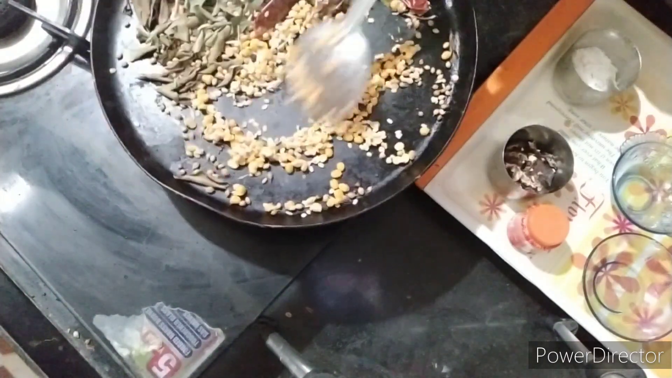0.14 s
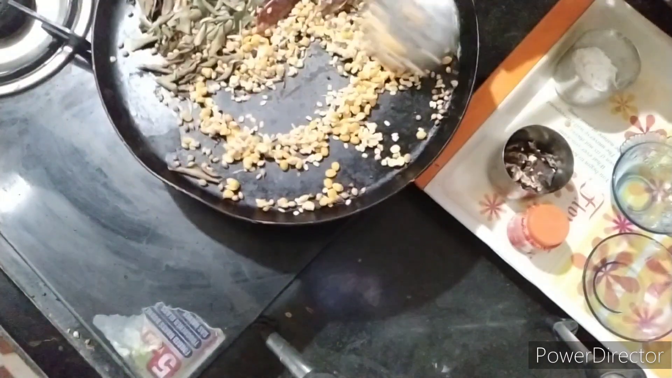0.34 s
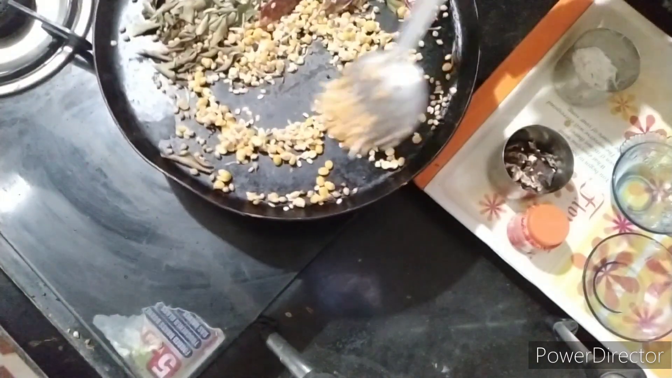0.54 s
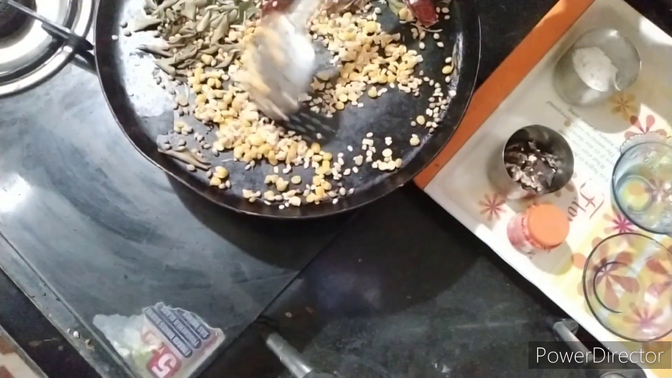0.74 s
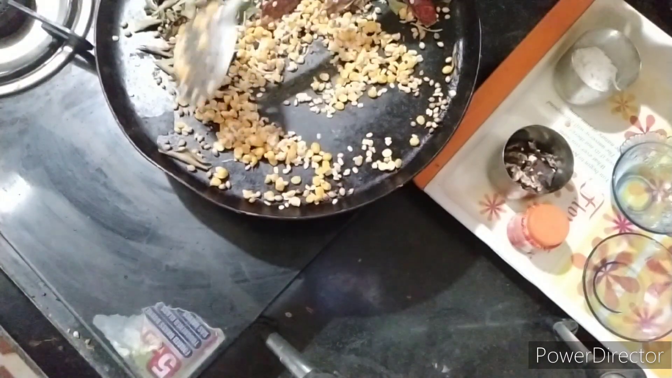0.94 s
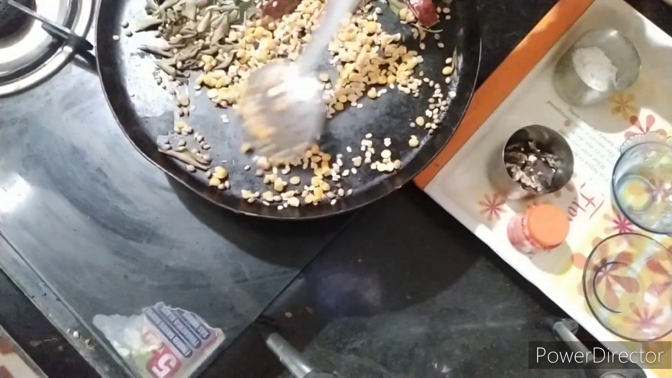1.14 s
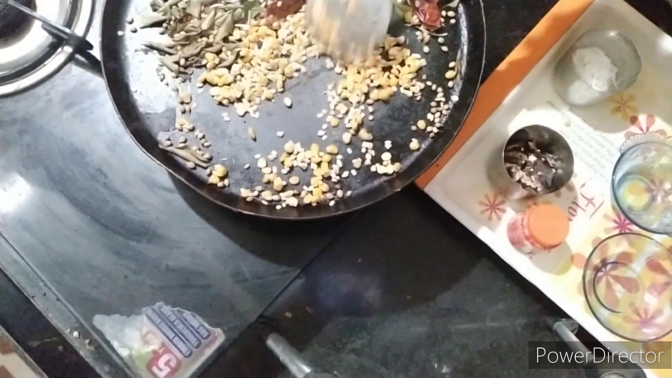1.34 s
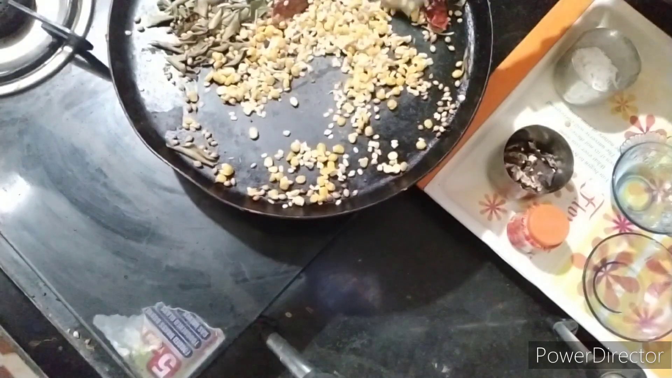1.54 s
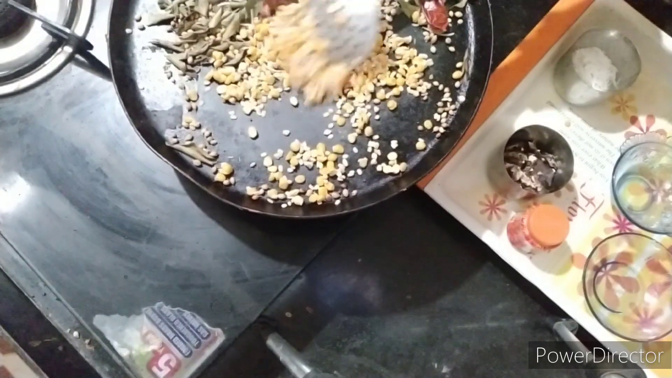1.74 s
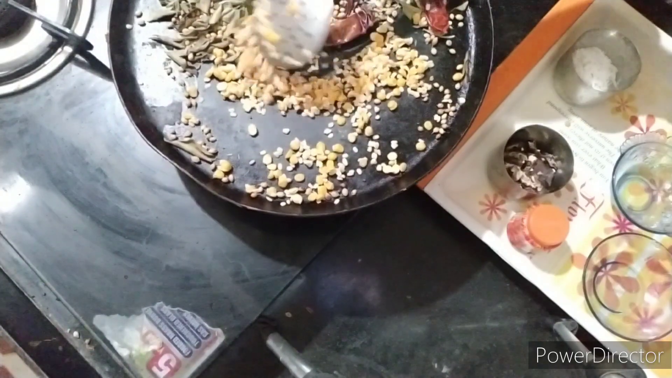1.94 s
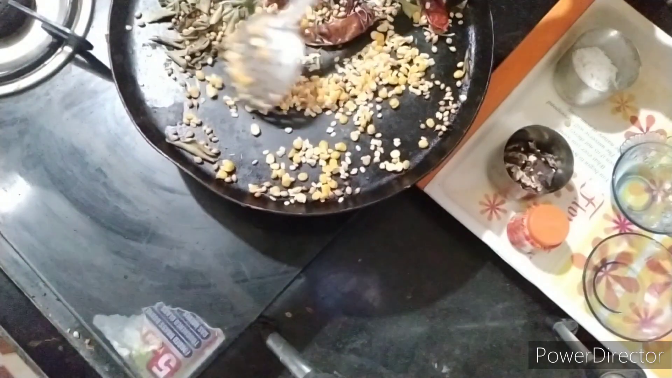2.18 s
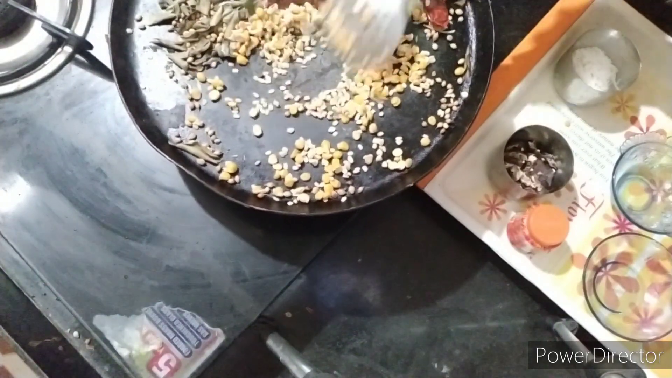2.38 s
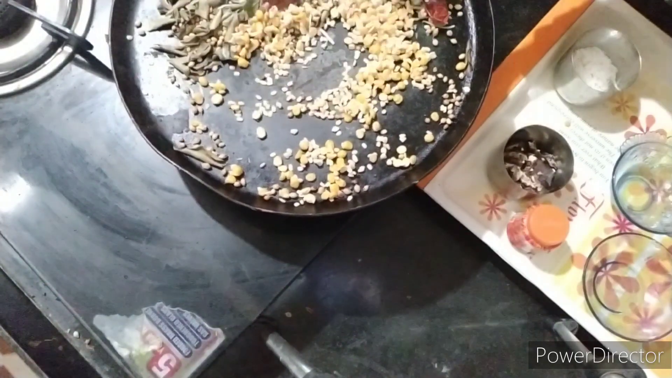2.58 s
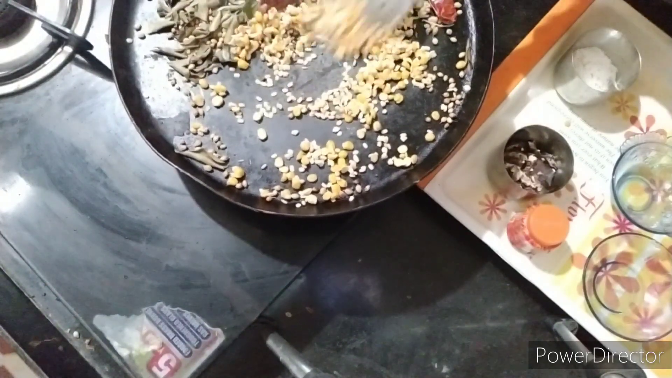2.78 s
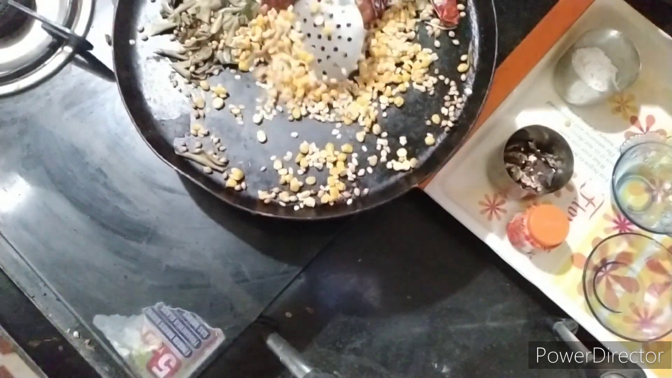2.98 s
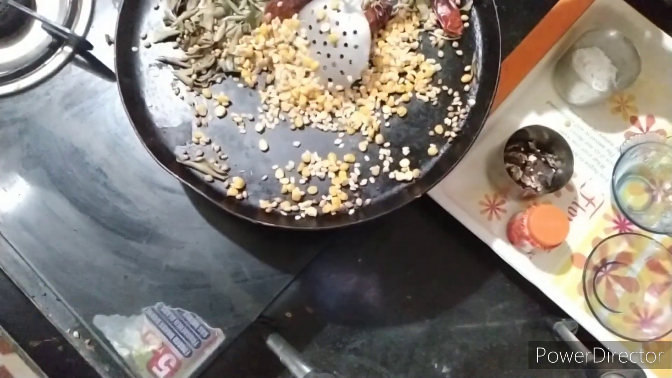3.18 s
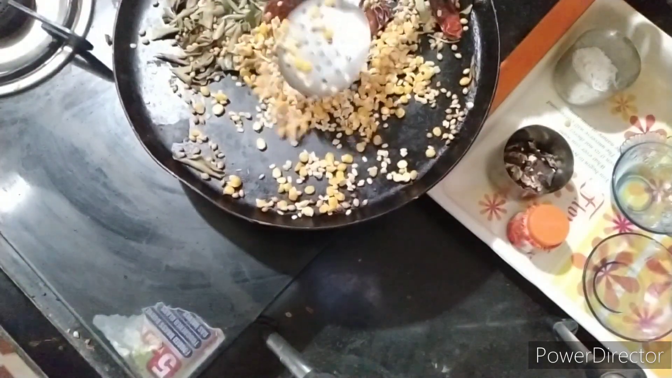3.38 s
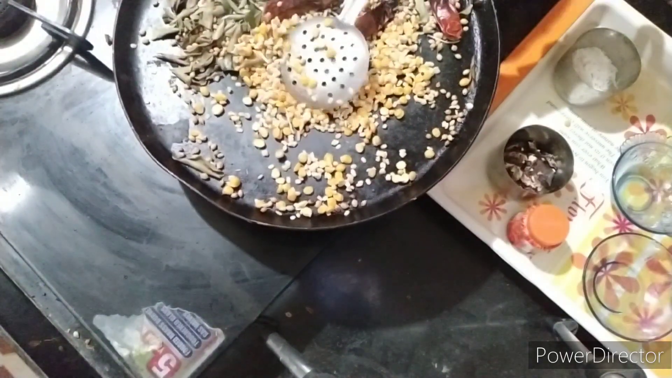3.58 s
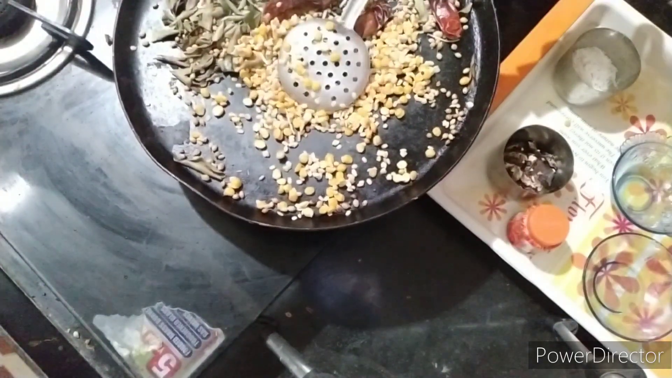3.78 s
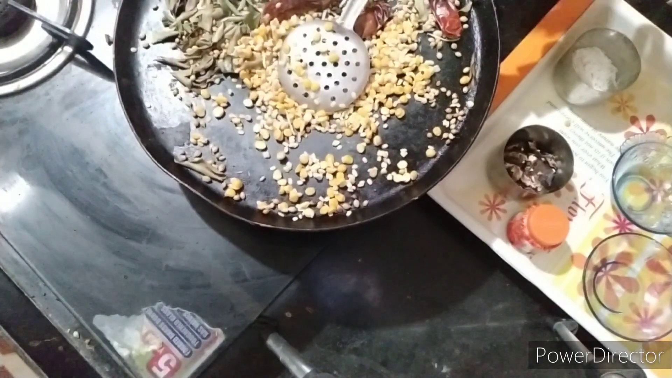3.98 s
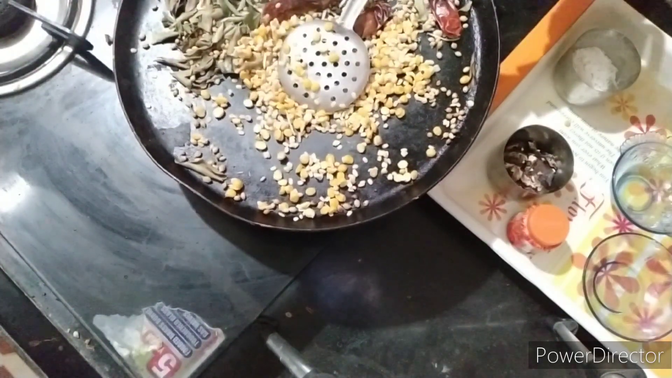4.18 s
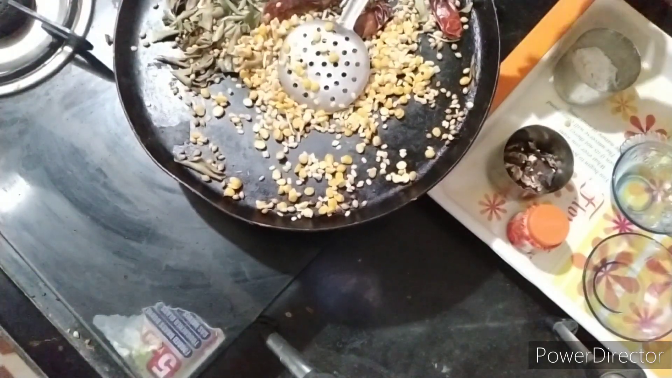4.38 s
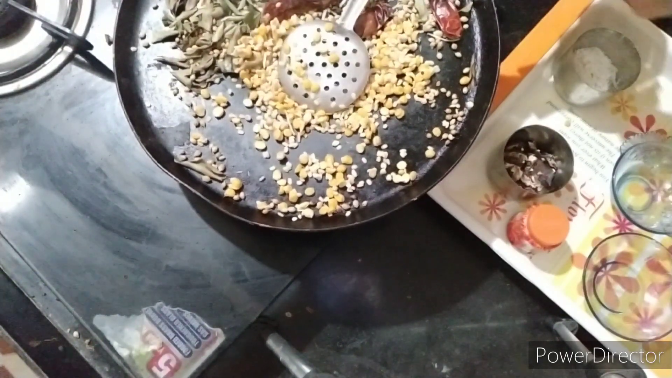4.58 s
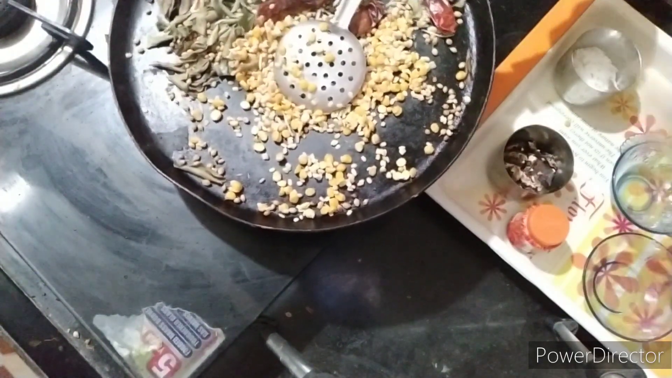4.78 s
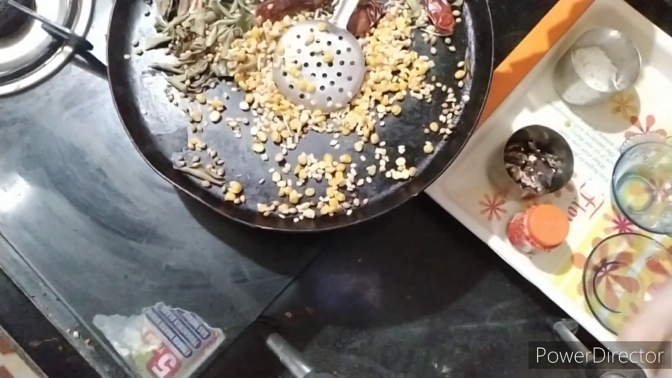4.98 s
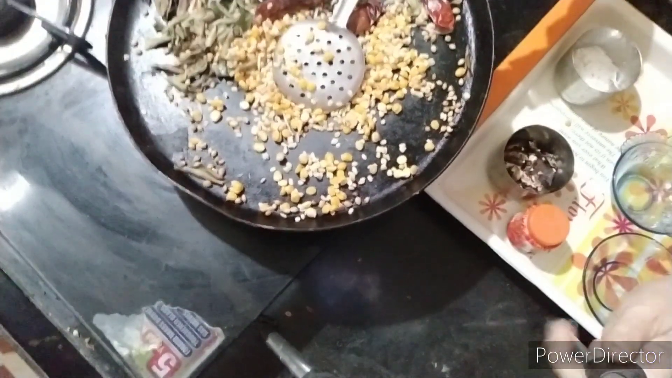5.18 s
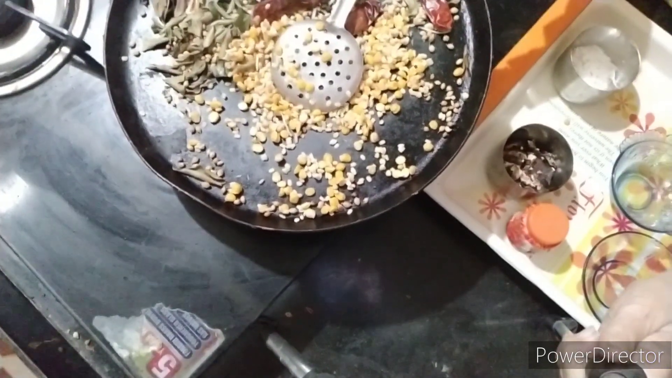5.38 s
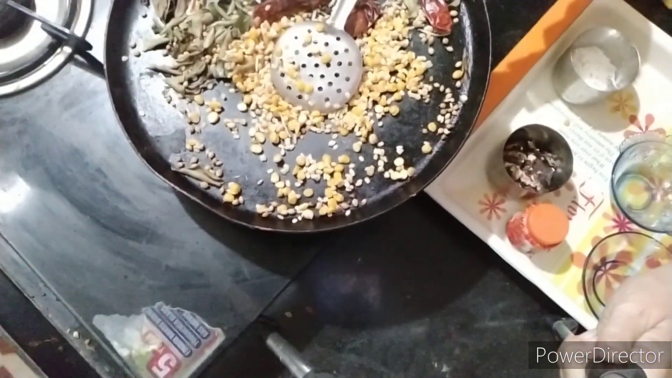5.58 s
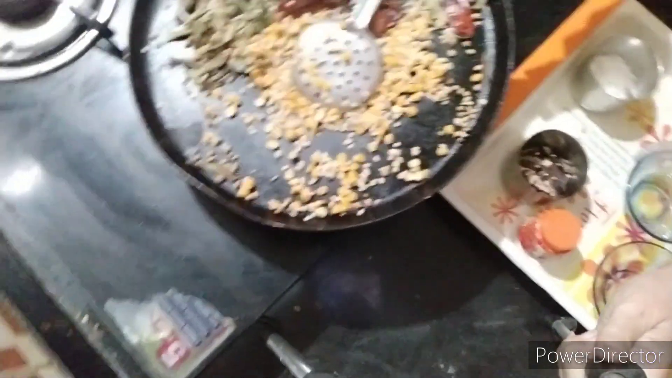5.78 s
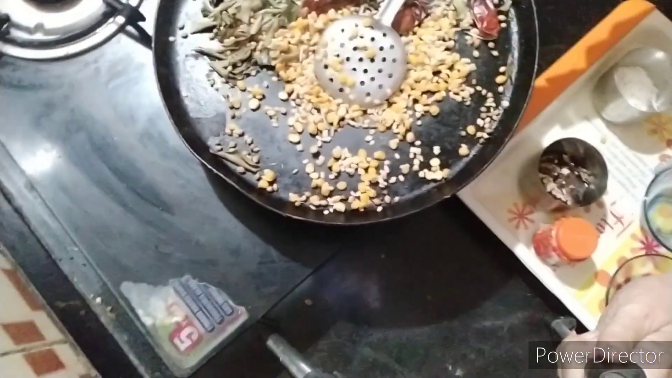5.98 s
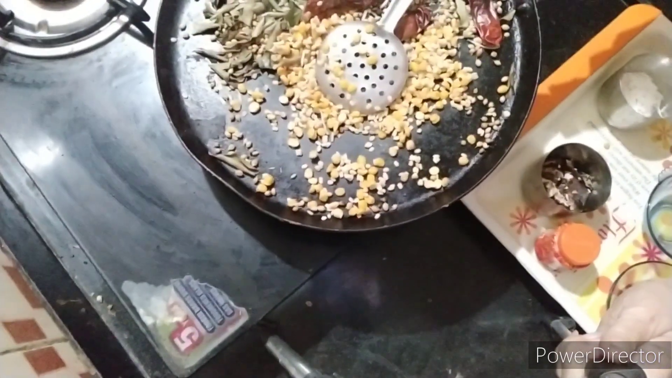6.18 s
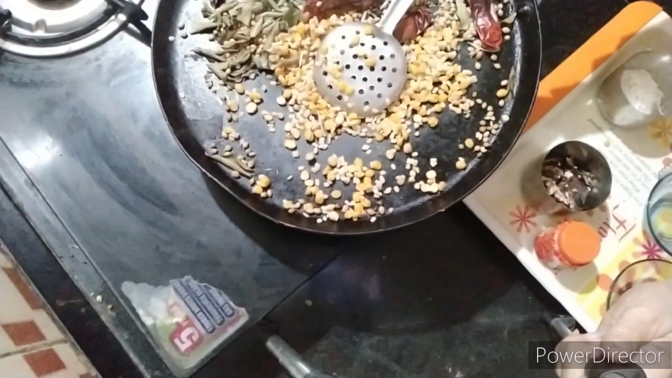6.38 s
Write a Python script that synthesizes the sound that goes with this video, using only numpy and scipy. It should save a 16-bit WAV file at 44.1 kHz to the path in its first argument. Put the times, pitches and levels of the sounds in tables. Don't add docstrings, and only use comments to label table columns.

```python
import sys
import numpy as np
from scipy import signal
from scipy.fft import rfft, irfft, next_fast_len
from scipy.io import wavfile
from scipy.ndimage import uniform_filter1d, map_coordinates

SR = 44100
rng = np.random.default_rng(int(sys.argv[2]) if len(sys.argv) > 2 else 0)


def boost(x):
    u = np.asarray(x, float) / 20
    return 10 ** u


def wrap_up_sound(samples):
    columns = np.atleast_2d(samples).T
    tamed = np.clip(columns, -1, 1)
    steps = np.round(tamed * 32767).astype(np.int16)
    wavfile.write(sys.argv[1], SR, steps)


N = 283550
LAID_DOWN = 4.4


def unit(x):
    return x / np.sqrt(np.mean(x ** 2) + 1e-20)


def along(points, hz):
    f, v = np.transpose(points)
    return np.interp(np.log(hz + 1), np.log(f + 1), v)


def filtered(x, response):
    m = next_fast_len(x.shape[-1] + 8192)
    return irfft(rfft(x, m) * response(np.fft.rfftfreq(m, 1 / SR)), m)[..., :x.shape[-1]]


def colour(points):
    hz = np.fft.rfftfreq(1024, 1 / SR)
    cepstrum = irfft(np.log(boost(np.maximum(along(points, hz), -60))))
    cepstrum[1:512] *= 2
    cepstrum[513:] = 0
    h = irfft(np.exp(rfft(cepstrum)))[:512]
    return h / np.linalg.norm(h)


def modes(table, widen):
    t = np.arange(SR // 4) / SR
    h = np.zeros(len(t))
    for k, (hz, width, db) in enumerate(table):
        fade = np.exp(-np.pi * width * widen * t)
        h += (-1) ** k * boost(db) * np.sqrt(width) * fade * np.sin(2 * np.pi * hz * t)
    return h / np.linalg.norm(h)


def ring(x, h):
    return signal.fftconvolve(x, h[None], axes=1)[:, :N]


def add_at(out, s, sound):
    out[:, round(s * SR):][:, :sound.shape[1]] += sound


def wobble(rate):
    return map_coordinates(rng.standard_normal(int(N * rate / SR) + 4), [np.arange(N) * rate / SR])


def swells(middle, length, level_db, rise=0.69):
    step = 64
    x = (np.arange(0, N + step, step) / SR - middle[:, None]) / length[:, None]
    x = np.where(x < 0, -x / rise, x)
    loss_db = 16 * x ** 1.18
    gain = np.sqrt(np.sum(boost(level_db[:, None] - loss_db) ** 2, 0))
    return np.interp(np.arange(N), np.arange(len(gain)) * step, gain)


def grains(per_s, spread_db, clump_db, bed, life, alike):
    struck = rng.random(N) < per_s / SR
    size = boost(spread_db * np.minimum(rng.exponential(size=N), 3))
    power = signal.lfilter([1], [1, -np.exp(-1 / (life * SR))], struck * size ** 2)
    bursts = np.sqrt(np.abs(power))
    common, apart = rng.standard_normal((2, N))
    turn = np.arccos(np.clip(alike, 0, 1)) / 2
    pair = np.cos(turn) * common + np.sin(turn) * apart * np.array([[1], [-1]])
    return unit(boost(clump_db * wobble(45)) * (unit(bursts) + bed) * pair)


# (frequency [Hz], level [dB])
KITCHEN_AIR = [(15, -14.5), (30, -5.5), (59, -9), (107, -18), (220, -12.5), (480, -17), (800, -23.5),
               (1500, -29.5), (3000, -34), (6000, -31), (8000, -35), (10000, -28), (12300, -33.5),
               (15800, -55)]
# (frequency [Hz], likeness [0 to 1])
AIR_LIKENESS = [(30, 0.29), (120, 0.27), (300, 0.25), (1000, 0.29), (4000, 0.17)]


def kitchen():
    def mid_and_side(hz):
        turn = np.arccos(np.clip(along(AIR_LIKENESS, hz), -1, 1)) / 2
        return boost(along(KITCHEN_AIR, hz)) * [np.cos(turn), np.sin(turn)]

    mid, side = filtered(rng.standard_normal((2, N)), mid_and_side)
    air = unit(np.array([mid + side, mid - side])) * boost(-59.5 + 0.45 * wobble(4.8))
    hum_hz = 160 + 3.5 * wobble(11)
    hum = boost(-63.5 + 2.1 * wobble(31)) * np.sin(2 * np.pi * np.cumsum(hum_hz) / SR)
    return (air + hum) * boost([[-.7], [.7]])


# (time [s], length [s], sway level [dB], rub level [dB])
GRIPS = [
    (0.127, 0.19, -71, -52.5),
    (0.496, 0.11, -57.5, -65),
    (1.0, 0.16, -56, -81.5),
    (1.205, 0.09, -59, -66),
    (1.66, 0.076, -55, -52),
    (2.5, 0.11, -57.5, -80),
    (3.1, 0.59, -64, -66.5),
    (4.66, 0.13, -61, -62),
    (5.46, 0.21, -60, -68),
    (5.958, .3, -56.5, -76),
]


def hand():
    def rumble(hz, q):
        return unit(filtered(rng.standard_normal(N), lambda f: 1 / (1 + (q * np.log2((f + 1) / hz)) ** 4)))

    s, length, sway_db, rub_db = np.transpose(GRIPS)
    sway = np.hypot(swells(s, length, sway_db), boost(-70)) * rumble(hz=44.7, q=2.4)
    rub = np.hypot(swells(s, length, rub_db), boost(-73.5)) * rumble(hz=84.4, q=3.0)
    return sway + rub


# (frequency [Hz], time to fall 60 dB [s])
TILE_ECHO = [(200, 0.19), (1500, 0.36), (9000, 0.52)]


def tiles(x):
    out, step = np.zeros((2, N + SR)), SR // 4
    for k in range(0, N, step):
        hz, t, z = signal.stft(rng.standard_normal((2, SR // 3)), SR, nperseg=256)
        z[1] = np.where(hz[:, None] < 700, z[0], z[1])
        fade = boost(-60 * t / along(TILE_ECHO, hz)[:, None])
        tail = signal.istft(z * fade, SR, nperseg=256)[1]
        wet = signal.fftconvolve(x[None, k:k + step], tail / np.linalg.norm(tail[0]), axes=1)
        out[:, k + 300:][:, :wet.shape[1]] += wet
    return out[:, :N]


# (frequency [Hz], width [Hz], level [dB])
PAN_LOW = [(170, 34, -13.5), (230, 57, -7.5), (313.7, 36, -6), (337, 20, -6.5), (410.4, 51, -0.5),
           (455, 69.7, 6), (491.3, 71, 2), (588.5, 17, -6.5), (606.4, 38, -1.5)]
PAN_HIGH = [(718.5, 73, 2), (796, 32, -2), (855.4, 35, 2), (958, 98, 3), (1070, 95, 3), (1197, 150, -4.5),
            (1291, 39, -4.5), (1456, 38, -6.5), (1697, 270, -6.5), (2014, 30, -10.5)]
# (frequency [Hz], level [dB])
CLINK = [(2500, -40.5), (4500, -12), (6000, -6.5), (7800, -4), (9600, -2.5), (10800, -9), (12000, -20),
         (14500, -34), (15800, -35.5)]


def blow(clack_db, knock_db, knock_hz, tick_db, ring_s, edge):
    t = np.arange(SR // 3) / SR
    hz, width, level = np.transpose(PAN_LOW + PAN_HIGH)[:, :, None]

    def crack(fast_s, tail_db, spectrum):
        fade = boost(-60 * t / fast_s) + boost(tail_db - 60 * t / ring_s)
        noise = rng.standard_normal((2, len(t))) * (1 - np.exp(-t / 0.001)) * fade
        return signal.fftconvolve(noise, colour(spectrum)[None], axes=1)[:, :len(t)]

    tick = boost(tick_db - 12.5) * crack(0.029, -3, CLINK)
    clack = boost(clack_db - 6.5) * crack(0.033, -2.5, edge)
    off_pitch_db = 6.6 * np.log2(hz / knock_hz) ** 2
    strength = boost(0.46 * level - off_pitch_db + rng.normal(0, 4.6, level.shape))
    phase = 2 * np.pi * (hz * boost(rng.normal(0, .3, hz.shape)) * t + rng.random(hz.shape))
    fade = boost(-60 * t / ring_s * boost(rng.normal(0, 1.75, hz.shape)))
    body = np.sum(strength * fade * np.sin(phase), 0) / np.linalg.norm(strength)
    attack = (1 - np.exp(-t / 0.00035)) * (1 + 0.87 * boost(-60 * t / 0.01))
    knock = boost(knock_db - 3.5) * attack * body
    late = .5 * np.roll(knock, 14) * np.array([[1], [-1]])
    return (tick + clack + knock + late) * boost([[-.9], [.9]])


# (frequency [Hz], level [dB])
JAR_EDGE = [(600, -29), (1200, -2.5), (2000, -1.5), (3000, -5), (4000, -13.5), (6000, -13.5), (9000, -44),
            (15000, -61)]
# (time [s], edge level [dB], knock level [dB], knock pitch [Hz])
SET_DOWN = [
    (4.4865, -51, -37.5, 409),
    (4.576, -43, -31, 458),
    (4.5927, -23.5, -26.5, 455),
    (4.705, -26.5, -24, 486),
    (4.8441, -51, -32.5, 570),
    (5.3294, -58, -55, 638),
    (5.8564, -52, -28.5, 575),
    (5.9111, -45, -43.5, 630),
    (6.296, -55, -65, 1480),
    (6.3111, -34, -44, 636),
]


def set_down():
    out = np.zeros((2, N + SR))
    for s, clack_db, knock_db, knock_hz in SET_DOWN:
        add_at(out, s, blow(clack_db, knock_db, knock_hz, clack_db - 3, ring_s=0.059, edge=JAR_EDGE))
    return out[:, :N]


# (frequency [Hz], level [dB])
LENTIL = [(2500, -45), (4500, -17.5), (6000, -13.5), (7800, -7), (9600, 1), (10800, -3), (12000, -10),
          (14500, -14.5), (15800, -16.5)]
# (time [s], peak level [dB])
SHARP_TICKS = [(0.074, -29.5), (0.176, -31.5), (0.271, -25.5), (0.4284, -25), (0.5156, -26), (0.6198, -29.5),
               (0.696, -26), (0.856, -41.5), (3.56, -36.5), (1.1433, -41), (1.1929, -6), (1.6257, -32),
               (1.78, -37), (1.9212, -32.5), (2.03, -30.5), (2.137, -31.5), (2.1989, -33), (2.252, -32.5),
               (2.677, -28.5), (2.8703, -29), (3.3468, -44.5), (3.379, -28.5), (3.6396, -34.5), (3.6651, -47.5),
               (3.716, -39.5), (3.5904, -29), (3.807, -29), (3.9759, -49), (4.0063, -47), (6.297, -36)]


def sharp_ticks():
    out, t = np.zeros((2, N + SR)), np.arange(SR // 20) / SR
    for s, db in SHARP_TICKS:
        fade = boost(-60 * t / 0.0069) + boost(-16.5 - 60 * t / 0.15)
        add_at(out, s, boost(db + 1.0) * fade * rng.standard_normal((2, len(t))))
    return ring(out, colour(LENTIL))


# (frequency [Hz], level [dB])
RIM = [(600, -28.5), (1200, -8), (2000, -3), (2800, -1.5), (4000, -6.5), (6000, -6), (9000, -27),
       (15000, -65)]
# (time [s], edge level [dB], knock level [dB], knock pitch [Hz])
KNOCKS = [(0.2194, -37, -30.5, 625), (0.2635, -52, -24.5, 455), (0.5481, -43, -33.5, 866),
          (0.6008, -33.5, -29, 1520), (0.6958, -31, -36, 475), (0.7537, -33.5, -27, 1070),
          (0.7788, -26, -21.5, 1240), (0.8554, -49, -31.5, 690), (1.192, -13, -16, 950),
          (1.3444, -32, -36, 891), (1.6633, -31, -43.5, 482), (2.2715, -41.5, -45, 402),
          (2.3019, -25, -27, 907), (2.5194, -39, -42.5, 334), (2.7805, -29, -37.5, 1060),
          (2.889, -41, -47, 880), (3.105, -37.5, -32, 1240), (3.2131, -31, -30.5, 480),
          (3.5441, -50, -49, 840), (3.56, -44.5, -54.5, 584), (3.59, -46.5, -62, 581),
          (3.8661, -44.5, -52, 398), (4.0647, -58, -36, 455), (4.2272, -42.5, -54.5, 830)]


def pan_knocks():
    out = np.zeros((2, N + SR))
    for s, clack_db, knock_db, knock_hz in KNOCKS:
        add_at(out, s, blow(clack_db, knock_db, knock_hz, clack_db + 9.5, ring_s=0.18, edge=RIM))
    return out[:, :N]


# (loudest time [s], length [s], rattle level [dB])
SWEEPS = [(0, 0.23, -40), (0.217, 0.27, -37), (0.295, 0.21, -47), (0.453, 0.15, -35), (0.548, 0.3, -33),
          (0.77, 0.48, -42), (0.99, 0.2, -57.5), (1.237, 0.062, -44.5), (1.367, 0.44, -38.5),
          (1.602, 0.037, -44.5), (1.688, .06, -42.5), (1.798, 0.098, -37), (1.893, 0.34, -39),
          (2.14, 0.098, -51.5), (2.307, 0.19, -42), (2.527, 0.45, -36.5), (2.699, 0.051, -35.5),
          (2.79, 0.13, -38), (2.912, 0.18, -33.5), (3.09, 0.17, -37.5), (3.224, 0.25, -39),
          (3.577, 0.12, -50.5), (3.787, 0.19, -50), (4.086, 0.36, -56.5), (4.232, 0.15, -56.5),
          (4.92, .2, -55), (5.806, 0.49, -60), (6.134, 0.23, -57.5), (6.316, 0.065, -56)]
# (middle time [s], length [s], level [dB], brightness [octaves over lowest modes])
SCRAPES = [(0.093, 0.12, -39, 0.85), (0.18, 0.24, -39.5, 0.84), (0.269, 0.095, -31, 0.87),
           (0.49, 0.18, -51.5, 0), (0.617, 0.068, -36.5, 2), (0.747, 0.14, -32, 1.64),
           (0.84, 0.045, -37, 2.7), (1.248, 0.037, -44, 1.5), (1.379, 0.13, -36.5, 1.47),
           (1.603, 0.078, -37, 0.82), (1.7, 0.055, -47, 3.5), (1.797, 0.087, -40, 3),
           (1.888, .14, -41.5, 3), (2.039, 0.16, -50, -0.46), (2.351, 0.11, -43.5, 1.56),
           (2.516, 0.21, -43, 3), (2.602, .16, -48.5, 0.14), (2.447, 0.062, -52, .5),
           (2.797, 0.056, -46, 1.9), (2.917, 0.15, -40, 3), (3.0, 0.22, -48, 3.5), (3.15, 0.18, -42, .7),
           (3.259, 0.13, -41, 3), (3.574, 0.12, -54, 1.3), (3.757, 0.045, -60.5, -0.1),
           (3.882, 0.057, -47.5, 3.5), (4.077, 0.084, -54, 2.5), (4.255, 0.058, -52, 2.5),
           (4.322, 0.15, -56, 3)]
# (middle time [s], length [s], level [dB], brightness [octaves])
SHUFFLES = [(4.499, 0.039, -49.5, 0.62), (4.625, 0.063, -43, 0.82), (4.723, 0.033, -35.5, 0.9),
            (4.873, 0.074, -46.5, 0.92), (4.954, 0.13, -52.5, 0.88), (5.324, 0.051, -57, .3),
            (5.78, .14, -55, 0.67), (5.873, 0.045, -49, 0.77), (5.938, 0.06, -46, 1.7), (6.0, 0.25, -55, 3),
            (6.154, 0.36, -53, 1.1), (6.332, 0.052, -43, 3), (6.38, 0.12, -43, 3.63)]


def stirring():
    s, length, db, octave = np.transpose(SCRAPES + SHUFFLES)

    def layer(centre):
        return swells(s, length, db - 3.5 * (octave - centre) ** 2)

    rolling = np.hypot(swells(*np.transpose(SWEEPS), rise=0.43), boost(-67))
    rubbing = layer(2.475)

    ticks = grains(190, 5.5, 1.0, bed=2.56, life=0.0014, alike=.05)
    rattle_gain = np.hypot(rolling, boost(-13) * rubbing)
    rattle = ring(rattle_gain * ticks, colour(LENTIL))

    scratches = grains(260, 7.3, 1.3, bed=2.3, life=0.00092, alike=0.085)
    drag_gain = np.hypot(rubbing, boost(-16) * rolling)
    drag = drag_gain * boost(-1.05) * scratches
    resting = np.arange(N) > LAID_DOWN * SR
    hiss = ring(drag * ~resting, colour(RIM)) + ring(drag * resting, colour(JAR_EDGE))

    slow_rub = grains(200, 3, 0.53, bed=1.2, life=0.006, alike=.9)
    drone = ring(layer(0.042) * slow_rub, modes(PAN_LOW, widen=1.1))
    quick_rub = grains(170, 5.6, 3.3, bed=1.2, life=.002, alike=.2)
    bright = ring(layer(1.47) * boost(-3.0) * quick_rub, modes(PAN_HIGH, widen=1.39))
    return rattle * boost([[-1.4], [1.4]]) + hiss + (drone + bright) * boost([[-1.2], [1.2]])


def scene():
    close = stirring() + pan_knocks() + set_down() + sharp_ticks()
    return close + boost(-3.5) * tiles(close.mean(0)) + kitchen() + hand()


# (frequency [Hz], rarity [standard deviations])
GAPS = [(2200, 3), (3300, 1.1), (4800, .8), (7000, 1), (8300, 2.2), (11000, 2.2), (12300, .7), (14800, .5),
        (15600, -.2)]


def flicker_bands(x):
    lead, wide = 465, 8
    hz, t, z = signal.stft(np.pad(x, ((0, 0), (lead, 0))), SR, "cosine", nperseg=2048, noverlap=1024)
    field = rng.standard_normal((len(hz) // wide + 1, len(t)))
    field = uniform_filter1d(uniform_filter1d(field, 2, 0), 3, 1)
    power = np.sum(np.abs(z) ** 2, (0, 1))
    attack = power > 3 * np.roll(power, 1)
    heard = np.repeat(unit(field), wide, 0)[:len(hz)] < along(GAPS, hz)[:, None]
    kept = heard | attack | np.roll(attack, 1)
    return signal.istft(z * kept, SR, "cosine", nperseg=2048, noverlap=1024)[1][:, lead:lead + N]


def band_limit(x):
    return signal.sosfilt(signal.butter(12, 16480, fs=SR, output="sos"), x)


def record(dry):
    def in_band(hz):
        return hz < 15830

    x = flicker_bands(filtered(dry, in_band))
    mix = filtered(np.clip(x, -.95, .95), in_band)
    return band_limit(mix)


dry = scene()
out = record(dry)
wrap_up_sound(out)
```